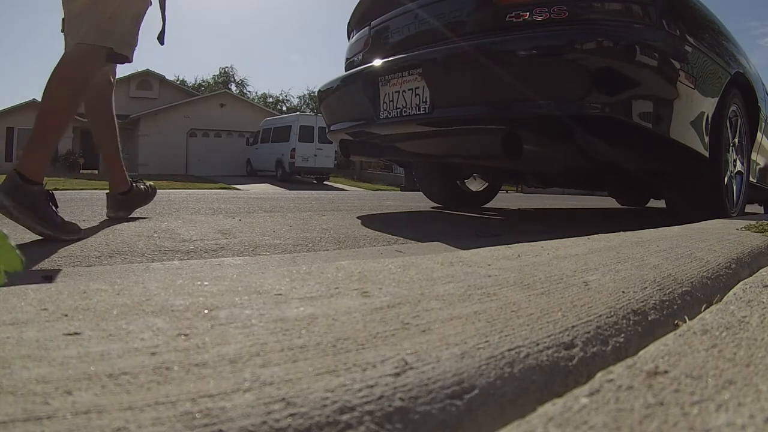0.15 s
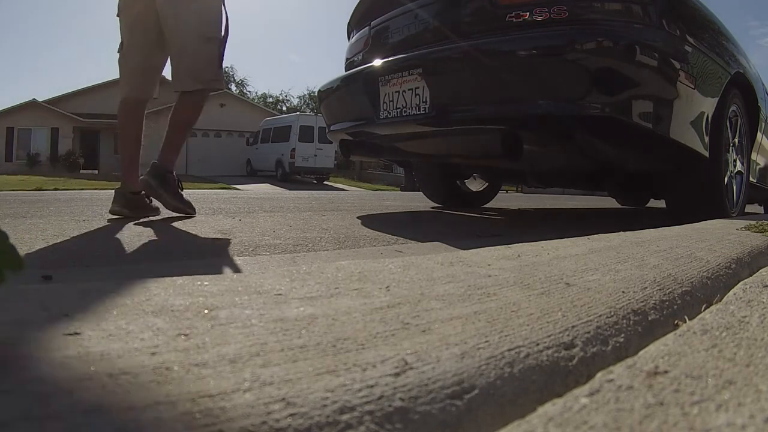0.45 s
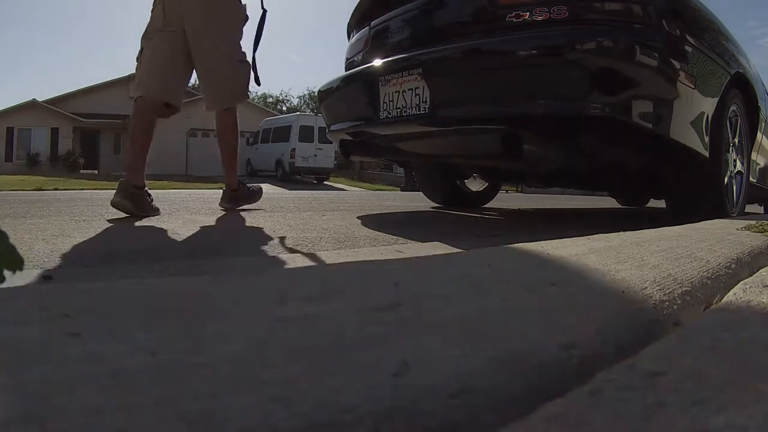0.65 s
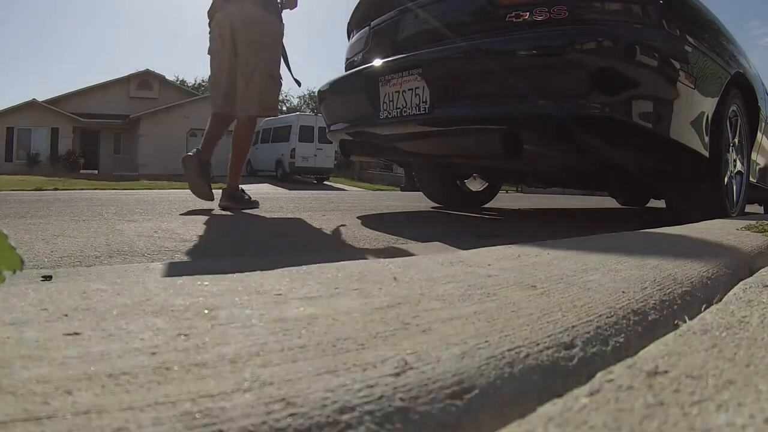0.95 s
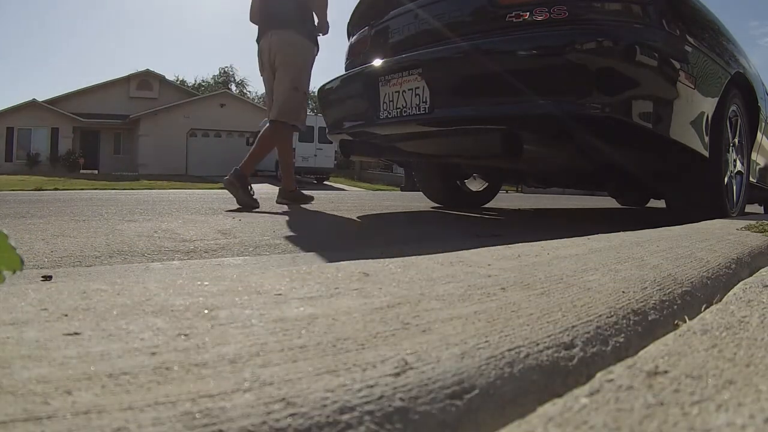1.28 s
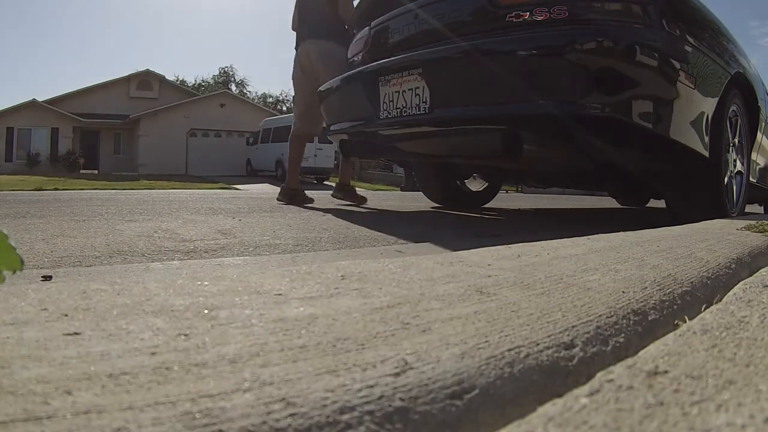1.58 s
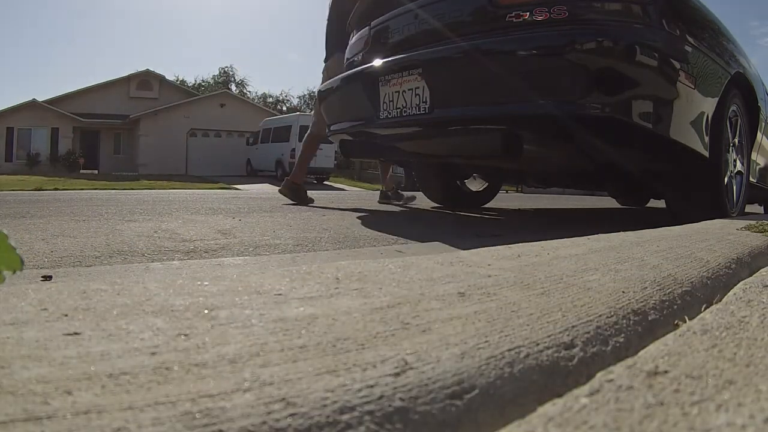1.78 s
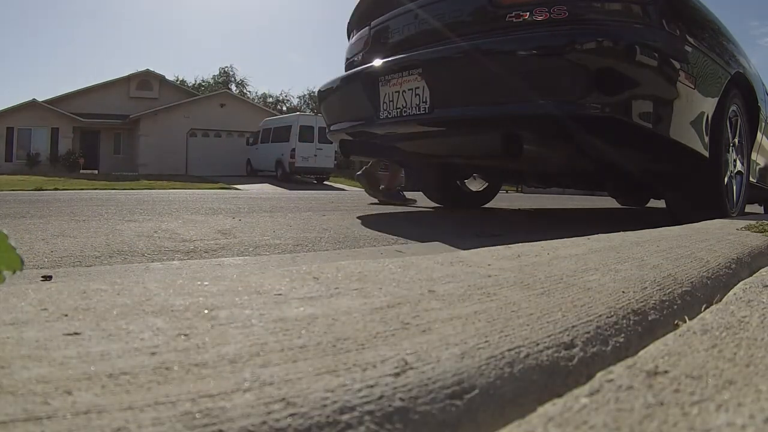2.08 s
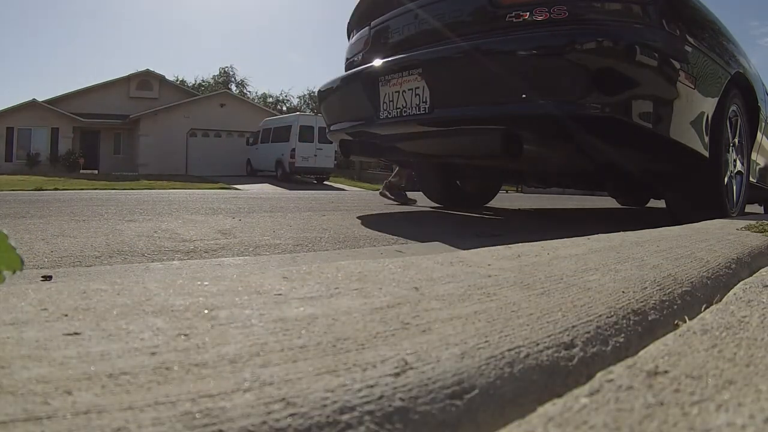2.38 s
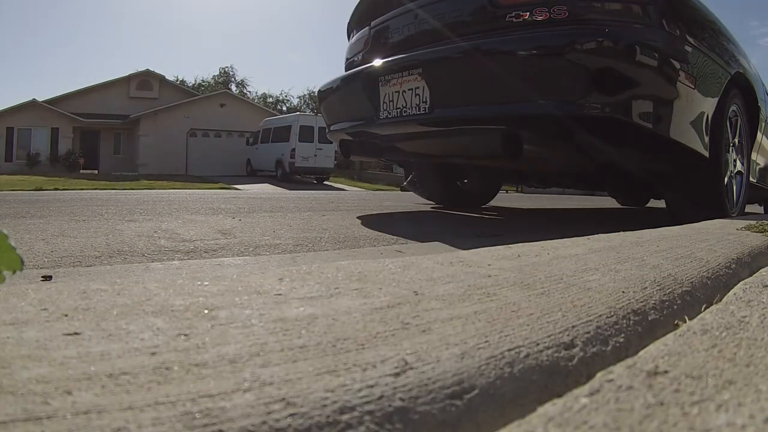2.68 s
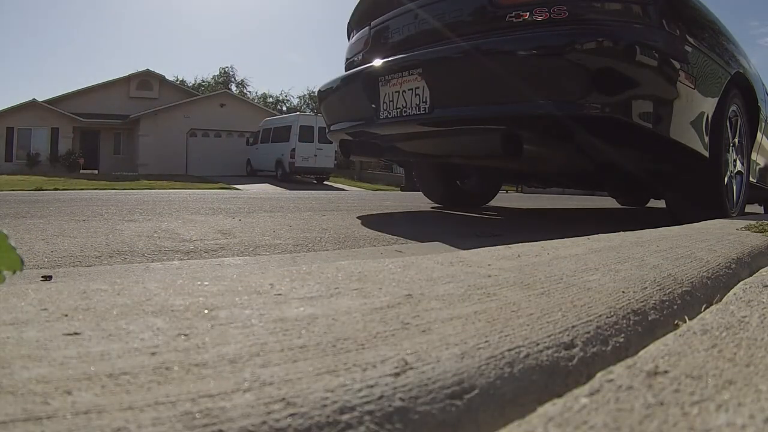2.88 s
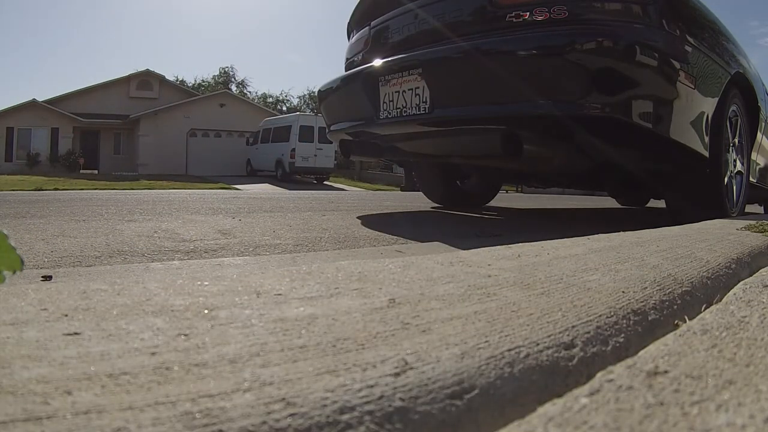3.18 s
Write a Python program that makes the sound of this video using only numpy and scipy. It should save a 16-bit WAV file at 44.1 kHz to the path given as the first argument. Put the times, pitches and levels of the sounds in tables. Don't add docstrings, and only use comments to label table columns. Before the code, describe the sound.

Footsteps crunch and scuff on gritty asphalt, walking away, then a car door handle clunks

```python
import sys
import numpy as np
from scipy import signal
from scipy.fft import rfft, irfft
from scipy.io import wavfile

SR = 44100
rng = np.random.default_rng(int(sys.argv[2]) if len(sys.argv) > 2 else 0)


def unload_audio(sound):
    columns = np.transpose(np.atleast_2d(sound))
    steps = np.round(np.clip(columns, -1, 1) * 32767)
    wavfile.write(sys.argv[1], SR, steps.astype(np.int16))


def gain_from_decibels(decibels):
    exponent = np.asarray(decibels, float) / 20
    return 10 ** exponent


N = 147294


def time_axis():
    return np.arange(N) / SR


def unit_rms(x):
    return x / np.sqrt(np.mean(x ** 2) + 1e-20)


def drift(rate_hz):
    pole = np.exp(-80 * np.pi * rate_hz / SR)
    noise = rng.standard_normal(N // 40 + 2002)
    slow = signal.lfilter([1], [1, -2 * pole, pole * pole], noise)[2000:]
    return np.interp(np.arange(N) / 40, np.arange(len(slow)), unit_rms(slow))


def ring(x, pitch_hz, t60_s):
    radius = gain_from_decibels(-60 / (t60_s * SR))
    angle = 2 * np.pi * min(pitch_hz, 0.45 * SR) / SR
    return signal.lfilter([0, np.sin(angle)], [1, -2 * radius * np.cos(angle), radius * radius], x + 1e-18)


def band_pass(x, low_hz, high_hz):
    return signal.sosfilt(signal.butter(2, [low_hz, high_hz], "band", fs=SR, output="sos"), x)


def struck(events):
    out = np.zeros(N)
    for start_s, level_db, pitch_hz, t60_s in events:
        i = int(start_s * SR)
        click = np.zeros(SR // 4)
        click[0] = gain_from_decibels(level_db)
        out[i:i + SR // 4] += ring(click, pitch_hz, t60_s)[:N - i]
    return out


# start_s, level_db (peak), pitch_hz
GRIT_GRAINS = [(0.0034, -52, 6300), (0.0036, -57, 10500), (0.0189, -60, 10300), (0.0189, -40, 2400),
               (0.0416, -48, 2300), (0.042, -55, 12300), (0.0507, -53, 5400), (0.0508, -46, 2200),
               (0.1283, -57, 6600), (0.2189, -52, 10600), (0.219, -48, 6200), (0.2206, -46, 3100),
               (0.2208, -53, 10300), (0.2208, -45, 5600), (0.2233, -52, 6200), (0.2249, -51, 5700),
               (0.2628, -47, 6400), (0.2631, -54, 10000), (0.2674, -56, 11800), (0.2718, -56, 10500),
               (0.2735, -55, 11200), (0.2735, -50, 6400), (0.2739, -48, 3200), (0.2766, -52, 11000),
               (0.2767, -44, 3100), (0.2768, -43, 5800), (0.2785, -52, 5900), (0.3019, -48, 6200),
               (0.302, -49, 11700), (0.3342, -51, 3000), (0.3678, -57, 7400), (0.3704, -63, 11800),
               (0.3912, -54, 6100), (0.3999, -57, 6400), (0.4153, -63, 11000), (0.5114, -62, 9900),
               (0.5191, -64, 10400), (0.5209, -63, 10700), (0.7337, -53, 2600), (0.7368, -53, 5900),
               (0.74, -60, 12700), (0.74, -54, 5700), (0.74, -50, 3100), (0.7415, -59, 11800),
               (0.76, -49, 2600), (0.7646, -57, 11300), (0.7649, -41, 3200), (0.7825, -43, 3300),
               (0.7825, -43, 6200), (0.7895, -52, 11500), (0.7895, -49, 6300), (0.8099, -59, 9700),
               (0.8101, -48, 6100), (1.3031, -60, 11400), (1.3095, -62, 10800), (1.3096, -52, 2700),
               (1.3318, -54, 5500), (1.3335, -61, 10200), (1.3337, -52, 6600), (1.3934, -59, 7200)]


def grit():
    cycles, gain_db = 6.5, 4
    return struck([(start_s, level_db + gain_db, pitch_hz, cycles / pitch_hz)
                   for start_s, level_db, pitch_hz in GRIT_GRAINS])


# start_s, level_db (peak), pitch_hz, t60_s
SOLE_KNOCKS = [(.017, -50, 478, 0.06), (.16, -36.5, 29.4, 0.19), (.585, -67, 510, 0.024),
               (.971, -40.5, 576, 0.012), (1.196, -49, 580, 0.028), (1.269, -57, 454, .03),
               (1.346, -64, 450, .03)]


def knocks():
    return struck(SOLE_KNOCKS)


# centre_s, length_s, level_db,
# pitch_hz
SOLE_SCUFFS = [(0.006, 0.16, -66, 2300), (0.14, 0.8, -73, 4060), (0.217, 0.03, -59, 4560),
               (0.218, .03, -64, 10100), (0.266, 0.036, -61.5, 4700), (0.265, 0.02, -65, 11000),
               (0.308, 0.047, -69, 4970), (0.744, 0.024, -64, 3700), (0.7594, 0.0087, -58.5, 3730),
               (.762, 0.075, -71, 11000), (0.788, 0.047, -64, 3800), (0.812, 0.016, -65.5, 5450),
               (1.337, 0.091, -66, 4160), (1.87, 0.081, -74, 4370), (2.145, .025, -77, 14300),
               (2.178, .03, -75, 14400), (3.06, 0.037, -65.5, 1950), (3.222, 0.0078, -63, 2300),
               (3.256, 0.028, -71, 2970)]


def scuffs():
    grains_per_s, spread_db, half_width_octaves = 3500, 3.8, 0.9
    hit = rng.random(N) < grains_per_s / SR
    size = gain_from_decibels(spread_db * np.minimum(rng.exponential(1, N), 4))
    grains = hit * size * rng.choice([-1, 1], N)
    out = np.zeros(N)
    for centre_s, length_s, level_db, pitch_hz in SOLE_SCUFFS:
        wide = 2 ** min(half_width_octaves, np.log2(15800 / pitch_hz))
        band = band_pass(grains, pitch_hz / wide, pitch_hz * wide)
        swell = np.exp(-2 * ((time_axis() - centre_s) / (length_s / 2)) ** 4)
        out += gain_from_decibels(level_db) * unit_rms(band) * swell
    return out


# pitch_hz, level_db, t60_s
PANEL_MODES = [(37.2, -18.5, 0.41), (72.7, -11, 0.52), (103, -6.5, 0.091), (176, -4.5, 0.16),
               (224, -9.5, 0.22), (294, -4, 0.076), (424, -3, 0.026), (578, -5, 0.049), (746, -3.5, 0.031),
               (1084, -17, 0.052), (1296, -15.5, 0.03), (2040, -11.5, 0.014), (2410, -23.5, 0.031),
               (4110, -17, 0.034)]
# start_s, level_db, rattle_length_s, contact_cutoff_hz
LATCH_CONTACTS = [(3.0572, -64, 0.083, 1220), (3.159, -68.5, 0.13, 1500), (3.2188, -61, 0.028, 6000),
                  (3.229, -57.5, 0.0087, 400), (3.2391, -46, 0.0083, 400), (3.242, -47.5, 0.029, 1800),
                  (3.247, -56, .014, 5000), (3.257, -55.5, 0.012, 4440), (3.265, -56.5, 0.019, 2500),
                  (3.271, -53, 0.036, 1500), (3.279, -57.5, .012, 400), (3.291, -58, 0.031, 700),
                  (3.304, -64, 0.015, 1110), (3.313, -59, 0.14, 1200)]


def door():
    strike, panel_db = 6.0, -10.5
    force = np.zeros(N)
    for start_s, level_db, length_s, cutoff_hz in LATCH_CONTACTS:
        age = time_axis() - start_s
        decay = (age >= 0) * np.exp(-np.maximum(age, 0) / (length_s / 2))
        burst = rng.standard_normal(N) * decay
        burst[int(start_s * SR) + np.arange(4)] += strike
        force += gain_from_decibels(level_db) * signal.lfilter(*signal.butter(2, cutoff_hz, fs=SR), burst)
    panel = np.zeros(N)
    for k, (pitch_hz, level_db, t60_s) in enumerate(PANEL_MODES):
        panel += (-1) ** k * gain_from_decibels(level_db) * ring(force, pitch_hz, t60_s)
    crack = band_pass(force, 1800, 5000)
    return gain_from_decibels(panel_db) * panel + crack


def whistle(points_s, pitch_hz, level_db):
    t = time_axis()
    level = gain_from_decibels(np.interp(t, points_s, level_db, -200, -200))
    phase = 2 * np.pi * np.cumsum(np.interp(t, points_s, pitch_hz)) / SR
    return np.sqrt(2) * level * np.sin(phase)


# after_start_s, pitch_hz, level_db
FIRST_NOTE = [(0, 3550, -8), (.011, 3880, -4), (.02, 3290, -2), (.05, 2840, 0), (.064, 2800, -4),
              (.08, 2780, -10)]
# after_start_s, pitch_hz, level_db
SECOND_NOTE = [(0, 3220, -9), (.005, 3120, 0), (.021, 2860, -1), (.033, 2930, -6), (.046, 2870, -14)]
# start_s, level_db (rms), extra_hook_db, second_start_s, second_level_db (rms)
CALL_TIMES = [(.197, -69, 1, .275, -69), (1.084, -69.5, 0, 1.166, -69), (2.219, -69, 5, 2.303, -71),
              (3.009, -67, -9, 3.096, -71)]
# start_s, length_s, from_hz, to_hz, level_db (rms)
LONE_NOTES = [(1.212, .03, 4050, 3880, -71), (1.28, .022, 2900, 2400, -69.5),
              (2.394, .014, 14450, 14420, -70), (2.175, .012, 14000, 14400, -79),
              (2.138, .018, 11000, 10900, -82), (2.447, .016, 2850, 2750, -72),
              (2.465, .03, 3450, 3350, -74), (2.395, .025, 3600, 3400, -77), (3.14, .035, 3200, 3800, -75)]
# delay_s, level_db
HOUSE_ECHOES = [(.009, -12), (.016, -12), (.027, -15)]


def birds():
    first_s, first_hz, first_db = np.transpose(FIRST_NOTE)
    second_s, second_hz, second_db = np.transpose(SECOND_NOTE)
    out = np.zeros(N)
    for start_s, level_db, hook_db, start2_s, level2_db in CALL_TIMES:
        hook = hook_db * (first_hz > 3400)
        out += whistle(first_s + start_s, first_hz, first_db + level_db + hook)
        out += whistle(second_s + start2_s, second_hz, second_db + level2_db)
    swell_at, swell_db = np.array([[0, 0.25, 0.7, 1], [-15, 0, -2, -15]])
    for start_s, length_s, from_hz, to_hz, level_db in LONE_NOTES:
        out += whistle(start_s + length_s * swell_at, np.linspace(from_hz, to_hz, 4), level_db + swell_db)
    out = out * gain_from_decibels(2.0 * drift(80.0))
    echoes = sum(gain_from_decibels(level_db) * np.roll(out, int(delay_s * SR)) for delay_s, level_db in HOUSE_ECHOES)
    return out + echoes


# pitch_hz, width_hz, level_db (rms at start), fade_db_per_s
ENGINE_ORDERS = [(129.5, 1.9, -52.5, 8.5), (107.3, 2.6, -55, 5.5), (67.7, 6.3, -64, 7.5),
                 (215.3, 2.8, -71, 1), (301.3, 29, -69, 10)]


def engine():
    out = np.zeros(N)
    for pitch_hz, width_hz, level_db, fade_db_per_s in ENGINE_ORDERS:
        t60_s = np.log(1000) / np.pi / width_hz
        noise = rng.standard_normal(N + SR)
        order = ring(ring(noise, pitch_hz, t60_s), pitch_hz, t60_s)[SR:]
        out += gain_from_decibels(level_db - fade_db_per_s * time_axis()) * unit_rms(order)
    return out


# pitch_hz, level_db (rms)
HUM_TONES = [(118.4, -54.5), (209.9, -69)]


def hum():
    out = np.zeros(N)
    for pitch_hz, level_db in HUM_TONES:
        level = gain_from_decibels(level_db + 1.01 * drift(5.8))
        out += np.sqrt(2) * level * np.sin(2 * np.pi * pitch_hz * time_axis())
    return out


# pitch_hz, level_db (per Hz)
AIR_SPECTRUM = [(20, -7), (70, 2), (250, -6), (800, -15.5), (2000, -21.5), (6000, -30), (11000, -37.5),
                (15000, -40.5)]


def air():
    level_db, flicker_db = -57, 1
    pitch_hz, colour_db = np.transpose(AIR_SPECTRUM)
    f = np.maximum(np.fft.rfftfreq(N, 1 / SR), 1)
    colour = gain_from_decibels(np.interp(np.log(f), np.log(pitch_hz), colour_db))
    hiss = irfft(rfft(rng.standard_normal(N)) * colour, N)
    return gain_from_decibels(level_db + flicker_db * drift(7.7)) * unit_rms(hiss)


def scene():
    walker = grit() + knocks() + scuffs()
    background = birds() + engine() + hum() + air()
    return (walker + door() + background)[None]


def roll_off(x):
    return signal.sosfilt(signal.butter(12, 15370, fs=SR, output="sos"), x)


def record(dry):
    mix = signal.sosfilt(signal.cheby2(12, 50, 15800, fs=SR, output="sos"), dry)
    return roll_off(mix)


dry = scene()
out = record(dry)
unload_audio(out)
```